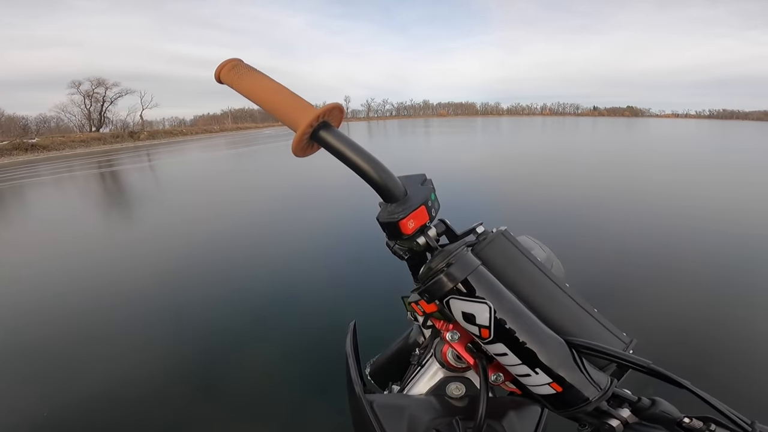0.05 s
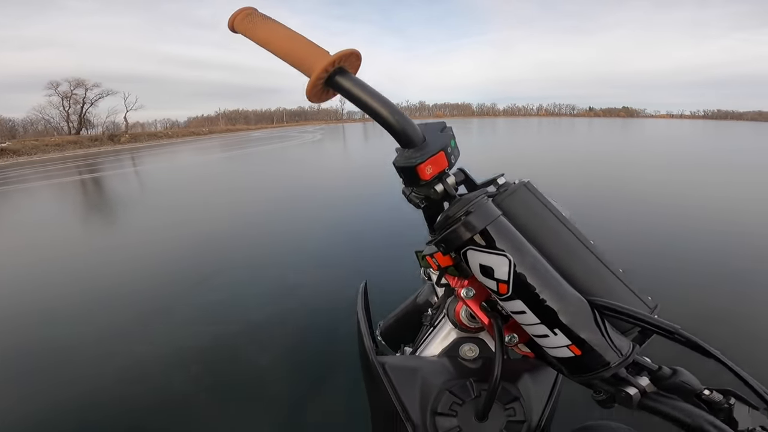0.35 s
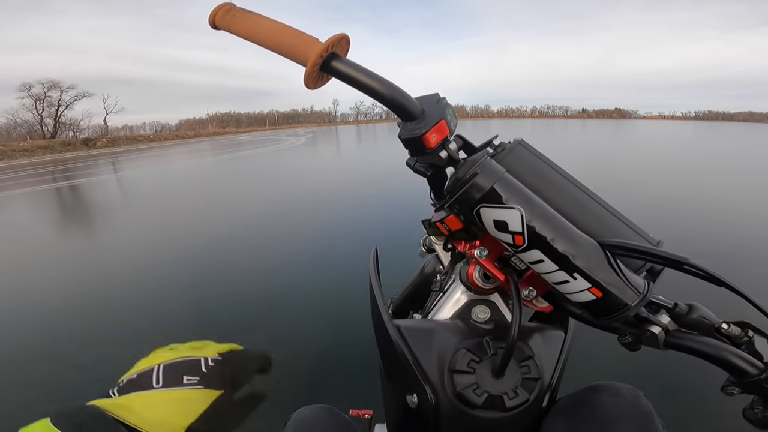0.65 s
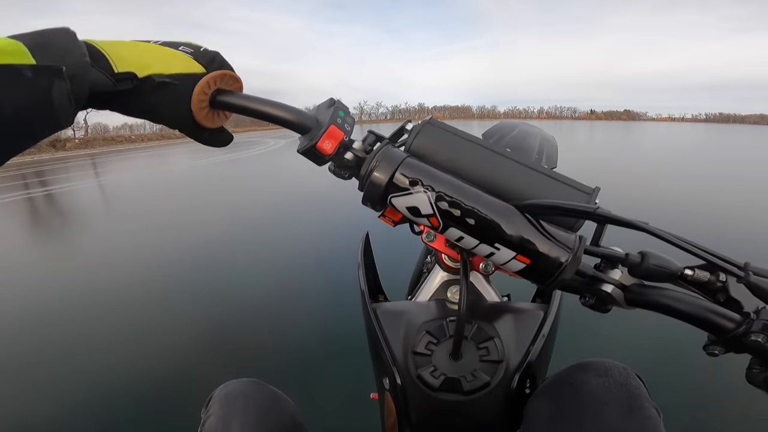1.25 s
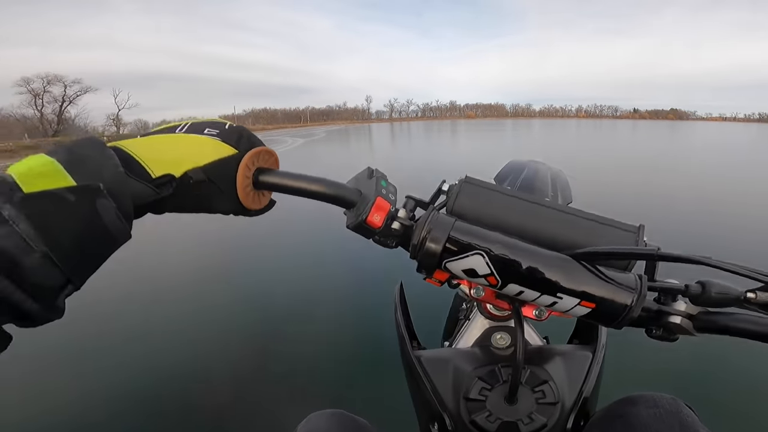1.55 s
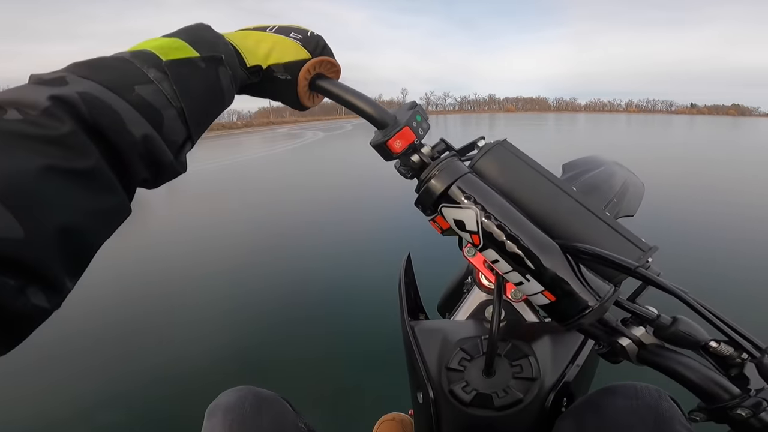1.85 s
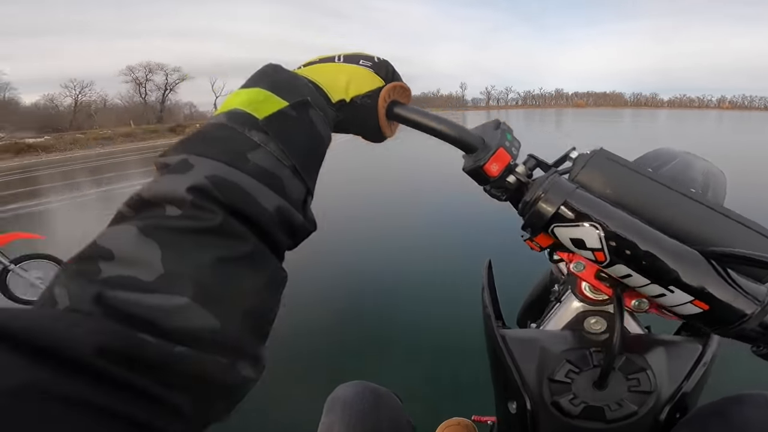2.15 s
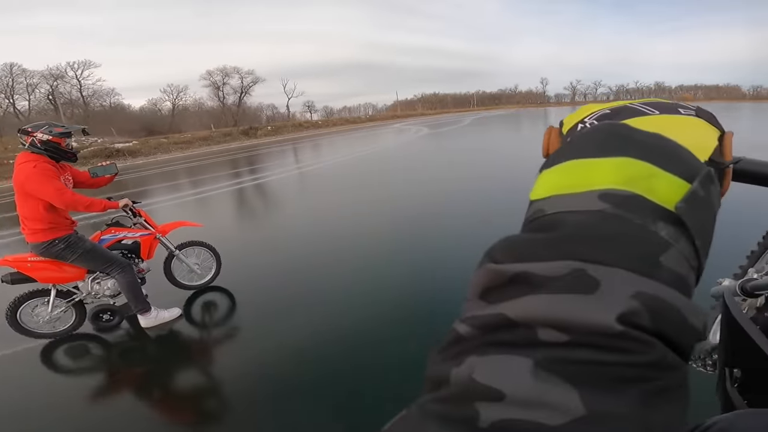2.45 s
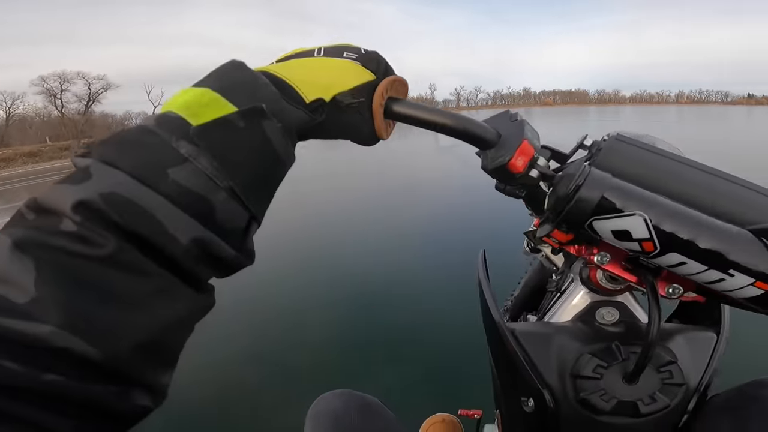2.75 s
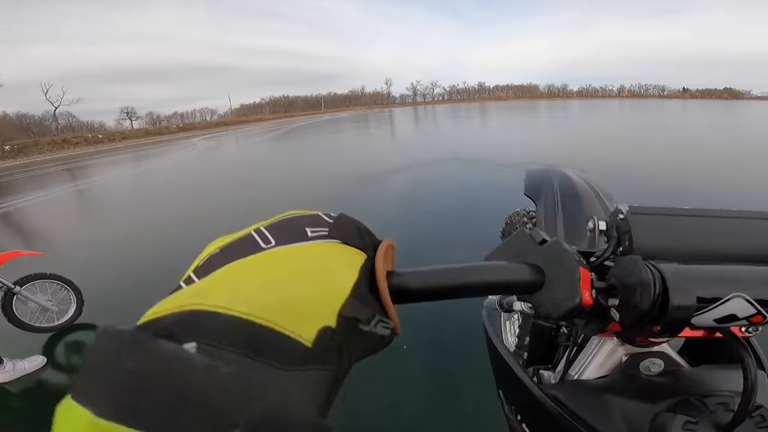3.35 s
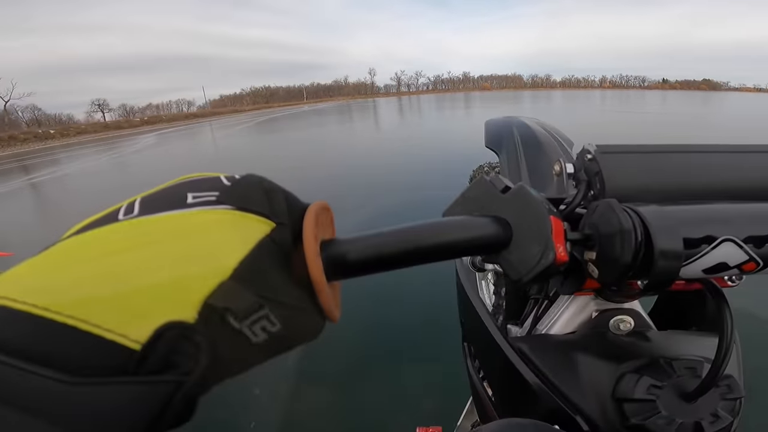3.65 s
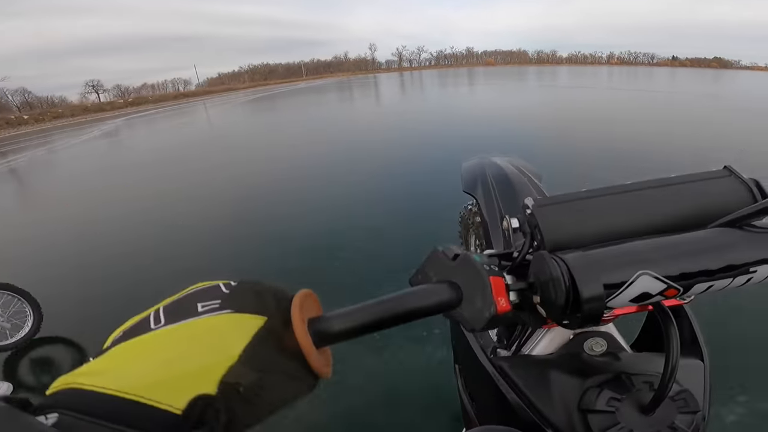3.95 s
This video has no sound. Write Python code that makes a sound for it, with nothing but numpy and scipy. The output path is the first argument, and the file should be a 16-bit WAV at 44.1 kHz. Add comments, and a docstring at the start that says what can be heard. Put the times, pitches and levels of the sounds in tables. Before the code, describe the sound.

A small single-cylinder dirt bike thumps and rasps as the throttle opens six times, burbling with a chain whirr in between. Wind buffets the microphone on the rider's chest, and studded tyres hiss faintly on lake ice.

```python
"""First come the thump and rasp of a small single-cylinder dirt bike pulling through gusts of wind,
heard from the rider's chest on lake ice. The throttle is open six times: suction pulses thump and
excite a resonance in the airbox. In between, the engine burbles and clatters and the slack chain
whirrs. The silencer booms at twice the firing rate, studded tyres hiss on the ice, and turbulent
air buffets the microphone."""
import sys
import numpy as np
from scipy import signal
from scipy.fft import rfft, irfft
from scipy.io import wavfile
from scipy.ndimage import uniform_filter1d, minimum_filter1d

SR = 44100
rng = np.random.default_rng(int(sys.argv[2]) if len(sys.argv) > 2 else 0)


def store_pcm(level_fs):
    """Save levels as 16-bit WAV."""
    pcm = np.round(np.clip(level_fs, -1, 1) * 32767).astype(np.int16)
    wavfile.write(sys.argv[1], SR, np.atleast_2d(pcm).T)


N = 176400
T = np.arange(N) / SR

# strength of the wind (time [s], relative level [dB])
WIND_ENVELOPE = [(0, -6.5), (.45, -13), (.63, -7.5), (.9, -15.5), (1.22, -12), (1.33, -15), (1.48, -14.5),
                 (1.6, -13), (1.92, -13), (2.02, -10), (2.16, -14.5), (2.25, -9), (2.48, -15), (2.72, -12),
                 (3.45, -13.5), (3.74, -10.5), (3.86, -11), (4, -16)]
# wind buffeting (frequency [Hz], relative level [dB])
WIND_SPECTRUM = [(10, -8), (25, -18.5), (45, 3.5), (80, 0.5), (130, -2), (220, -6), (330, -11.5),
                 (600, -36), (2000, -85)]
# tyres on ice and engine clatter (frequency [Hz], relative level [dB])
ROLLING_SPECTRUM = [(100, -6), (200, 3), (360, 1), (520, -4), (780, -2), (1000, -5), (1500, -9),
                    (2200, -16), (2900, -15), (4200, -19), (5300, -31), (7300, -35), (10000, -52),
                    (15000, -70)]
# strength of the chain and stud whirr (time [s], relative level [dB])
WHIRR_ENVELOPE = [(0, -36.5), (.2, -41), (.38, -37.5), (.46, -43.5), (.6, -33), (.76, -35), (.83, -52.5),
                  (1.13, -45), (1.22, -31.5), (1.55, -38.5), (1.64, -49), (1.9, -45.5), (1.97, -34),
                  (2.23, -40), (2.3, -55.5), (2.68, -42), (2.82, -36), (2.98, -39), (3.05, -54),
                  (3.62, -36), (3.7, -34), (3.84, -36), (3.93, -42), (4, -40)]
# ticks of chain and studs (frequency [Hz], relative level [dB])
WHIRR_SPECTRUM = [(300, -12), (700, 2), (1000, 3), (1350, 1), (1750, 2), (2300, -1), (2900, 1), (4200, -2),
                  (5300, -13), (6300, -17), (7400, -16), (9000, -25), (11300, -33), (12200, -28),
                  (15000, -48)]
# boom of the silencer (time [s], level [dB])
BOOM_ENVELOPE = [(0, -16), (.35, -12.5), (.6, -23), (.87, -15.5), (1.2, -17), (1.5, -15.5), (1.8, -13),
                 (2, -19.5), (2.35, -15), (2.65, -17.5), (2.76, -22), (3, -17), (3.25, -20), (3.48, -15.5),
                 (3.75, -23.5), (4, -16.5)]
# mechanical clatter while coasting (frequency [Hz], relative level [dB])
CLATTER_SPECTRUM = [(400, -20), (650, -2), (780, 1), (1000, -1), (1300, -9), (1750, -7), (2200, -15),
                    (4000, -32), (9000, -70)]
# growl of the intake (frequency [Hz], relative level [dB])
GROWL_SPECTRUM = [(300, -22), (520, -8), (640, -6), (780, 1.5), (900, -4), (1060, -4), (1300, -10),
                  (1700, -12), (2200, -22), (4500, -40), (9000, -75)]
# one firing leaving airbox and silencer
# (frequency [Hz], relative level pulling [dB], relative level coasting [dB])
FIRING_SPECTRA = [(20, -39.5, -53.5), (59.4, -22, -32.5), (122, -32.5, -33), (167, -30, -22.5),
                  (243, -24, -25.5), (297.6, -17.5, -21), (380, -14.5, -15.5), (422, -16.5, -22),
                  (485.3, -27.5, -29), (558, -35, -41.5), (626, -53.5, -37), (1000, -93, -89.5),
                  (3950, -100, -100)]
# engine speed (time [s], firing rate [Hz])
FIRING_RATE = [(0.0, 55.08), (0.27, 61.19), (0.41, 63.53), (0.57, 58.73), (0.73, 56.22), (0.85, 58.64),
               (1.11, 62.31), (1.25, 58.26), (1.52, 55.4), (1.62, 57.18), (1.89, 61.23), (2.19, 54.71),
               (2.3, 58.39), (2.4, 58.3), (2.68, 62.6), (2.8, 58.65), (2.92, 57.42), (3.18, 58.85),
               (3.65, 65.51), (3.76, 61.41), (3.89, 58.88), (4.0, 61.1)]
# throttle openings (open [s], shut [s], build-up [s], thump level [dB], rasp level [dB],
# first rasp resonance [Hz], last rasp resonance [Hz], growl level [dB])
THROTTLE_OPENINGS = [(-.15, 0.417, 0.14, -13, -31.5, 1220, 1285, -28),
                     (0.782, 1.129, 0.12, -15, -40, 1370, 1350, -35),
                     (1.546, 1.903, 0.11, -13.5, -37, 1505, 1340, -34.5),
                     (2.209, 2.677, 0.13, -15, -46.5, 1595, 1420, -30),
                     (2.953, 3.659, 0.18, -15.5, -39.5, 1730, 1347, -32),
                     (3.905, 4.192, 0.048, -15.5, -35.5, 1350, 1280, -30.5)]

PULL_PHASE, COAST_PHASE = .3524, .58  # where the pulse starts, as a fraction of the engine cycle
OPEN_S, SHUT_S = .03, .02
WIND_DB, ROLLING_DB, WHIRR_DB, BURBLE_DB, CLATTER_DB = -7.5, -33.5, -5.5, -18, -34


def amp(db):
    """The decibel scale: 20 dB is a factor of ten in amplitude."""
    return 10 ** (np.asarray(db) / 20)


def unit_rms(x):
    """Normalisation to unit mean power."""
    return x / np.sqrt(np.mean(x ** 2) + 1e-20)


def curve(points):
    """Linear interpolation between (time, value) points."""
    return np.interp(T, *np.transpose(points))


def colour(x, points, size=8192):
    """Minimum-phase filtering by a (frequency, level) response; output at rms 1."""
    hz, db = np.transpose(points)
    bin_hz = abs(np.fft.fftfreq(size, 1 / SR))
    log_gain = np.log(amp(np.interp(np.log(bin_hz + 1), np.log(hz), db)))
    response = np.exp(np.conj(signal.hilbert(log_gain)))
    ring = np.fft.ifft(response).real[:size // 2]
    padded = np.r_[x[:size][::-1], x]
    return unit_rms(signal.fftconvolve(padded, ring)[size:size + N])


def drift(hz):
    """Low-pass filtering turns noise into a slow fluctuation of rms 1."""
    low_pass = np.exp(-(np.fft.rfftfreq(N, 1 / SR) / hz) ** 2)
    return unit_rms(irfft(rfft(rng.standard_normal(N)) * low_pass, N))


def resonate(x, hz, width_hz):
    """Resonance at a moving frequency, applied twice for steep sides."""
    carrier = np.exp(2j * np.pi * np.cumsum(hz) / SR)
    pole = np.exp(-np.pi * width_hz / SR)
    baseband = signal.lfilter([1], np.poly([pole, pole]), x / carrier)
    return unit_rms((carrier * baseband).real)


def duct_echoes(x, delays_s=(.0011, .0026), reflection=.55):
    """All-pass reflections in the ducts smear each pulse without colouring it."""
    for delay_s in delays_s:
        feedback = np.r_[1, np.zeros(round(delay_s * SR)), -reflection]
        x = signal.lfilter(feedback[::-1], feedback, x)
    return x


def opening(start, stop, rise_s):
    """Trapezoidal envelope, 0 to 1, of one twist of the throttle."""
    return np.clip((T - start + OPEN_S / 2) / rise_s, 0, 1) * np.clip((stop - T) / SHUT_S + .5, 0, 1)


def firings(cycles, phase, uneven_db, jitter_s):
    """A quasi-periodic impulse train: one suction pulse per cycle, varying in strength and timing."""
    due = np.arange(int(cycles[-1] - phase) + 1) + phase
    strength, lateness = rng.standard_normal((len(due), 2)).T
    at = np.clip((np.interp(due, cycles, T) + jitter_s * lateness) * SR, 0, N - 2)
    sample, fraction = at.astype(int), at % 1
    size = amp(uneven_db * strength)
    return -np.bincount(sample, size * (1 - fraction), N) - np.bincount(sample + 1, size * fraction, N)


def puffs(cycles, phase, spread, noise_share):
    """Once per cycle, a sharp pulse inside a burst of noise; being incoherent, their powers add."""
    offset = (cycles - phase + .5) % 1 - .5
    bursts = unit_rms(np.exp(-.5 * (offset / spread) ** 2) * rng.standard_normal(N))
    pulses = unit_rms(firings(cycles, phase, uneven_db=.8, jitter_s=0))
    return np.sqrt(noise_share) * bursts + np.sqrt(1 - noise_share) * pulses


def wind(gust_db=.5):
    """Turbulent pressure fluctuations at the microphone make a lumpy, low buffeting."""
    level_db = WIND_DB + curve(WIND_ENVELOPE) + gust_db * drift(hz=18)
    return amp(level_db) * colour(rng.standard_normal(N), WIND_SPECTRUM)


def rolling(cycles, throb_depth=.083, waver_db=.8):
    """Broadband tyre rush and engine clatter, slightly amplitude-modulated at the firing rate."""
    throb = 1 + throb_depth * np.cos(2 * np.pi * (cycles - COAST_PHASE))
    level_db = ROLLING_DB + waver_db * drift(hz=14)
    return amp(level_db) * colour(throb * rng.standard_normal(N), ROLLING_SPECTRUM)


def chain_whirr(ticks_per_s=1800, tick_spread_db=3, tick_share=.4, waver_db=.6):
    """Shot noise: dense ticks of chain and tyre studs merge, loudest when the chain is slack."""
    hits = rng.random(N) < ticks_per_s / SR
    strength = amp(tick_spread_db * np.minimum(rng.exponential(1, N), 4))
    ticks = unit_rms(hits * strength * rng.choice([-1, 1], N))
    grain = np.sqrt(tick_share) * ticks + np.sqrt(1 - tick_share) * rng.standard_normal(N)
    level_db = WHIRR_DB + curve(WHIRR_ENVELOPE) + waver_db * drift(hz=14)
    return amp(level_db) * colour(grain, WHIRR_SPECTRUM)


def silencer_boom(cycles, shut, lag_cycles=.074):
    """Forced oscillation: the silencer swings twice per firing, locked to the pulse that drives it."""
    phase = PULL_PHASE + (COAST_PHASE - PULL_PHASE) * shut + lag_cycles
    return amp(curve(BOOM_ENVELOPE)) * np.sqrt(2) * np.cos(2 * np.pi * 2 * (cycles - phase))


def engine_coasting(cycles, shut):
    """Throttle shut: cycle-to-cycle variation makes softer pulses burble over a loose clatter."""
    pulses = firings(cycles, COAST_PHASE, uneven_db=.9, jitter_s=.00007)
    burble = colour(pulses, np.array(FIRING_SPECTRA)[:, [0, 2]])
    knocks = puffs(cycles, phase=.6, spread=.45, noise_share=.5)
    clatter = colour(duct_echoes(knocks), CLATTER_SPECTRUM)
    return shut * (amp(BURBLE_DB) * burble + amp(CLATTER_DB) * clatter)


def engine_pulling(cycles):
    """Throttle open: even pulses thump at once; gulps of air build a growl and a resonant airbox rasp."""
    pulses = firings(cycles, PULL_PHASE, uneven_db=.45, jitter_s=.00003)
    thump = colour(pulses, np.array(FIRING_SPECTRA)[:, [0, 1]])
    rasp_air = puffs(cycles, phase=.48, spread=.2, noise_share=.3)
    growl_air = puffs(cycles, phase=.37, spread=.25, noise_share=.3)
    growl = colour(duct_echoes(growl_air), GROWL_SPECTRUM)
    out = np.zeros(N)
    for start, stop, build_s, thump_db, rasp_db, first_hz, last_hz, growl_db in THROTTLE_OPENINGS:
        rasp = resonate(rasp_air, np.interp(T, [start, stop], [first_hz, last_hz]), width_hz=240)
        out += amp(thump_db) * opening(start, stop, OPEN_S) * thump
        out += opening(start, stop, build_s) * (amp(rasp_db) * rasp + amp(growl_db) * growl)
    return out


def scene():
    """Superposition of engine, tyres, chain and wind, in mono."""
    cycles = np.cumsum(curve(FIRING_RATE)) / SR
    shut = 1 - sum(opening(start, stop, OPEN_S) for start, stop, *_ in THROTTLE_OPENINGS)
    engine = engine_pulling(cycles) + engine_coasting(cycles, shut) + silencer_boom(cycles, shut)
    return (engine + rolling(cycles) + chain_whirr() + wind())[None]


def record(dry):
    """Peak limiting by a smoothed gain, then band limiting by a low-pass filter."""
    ceiling, cutoff_hz = .78, 15350
    needed_gain = ceiling / np.maximum(abs(dry), ceiling)
    gain = uniform_filter1d(minimum_filter1d(needed_gain, size=900), size=700)
    low_pass = signal.firwin(511, cutoff_hz, window=("kaiser", 9), fs=SR)
    return signal.oaconvolve(dry * gain, low_pass[None], "same")


dry = scene()
out = record(dry)
store_pcm(out)
```